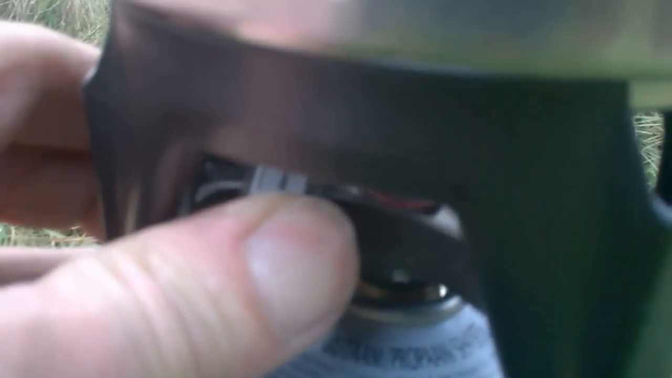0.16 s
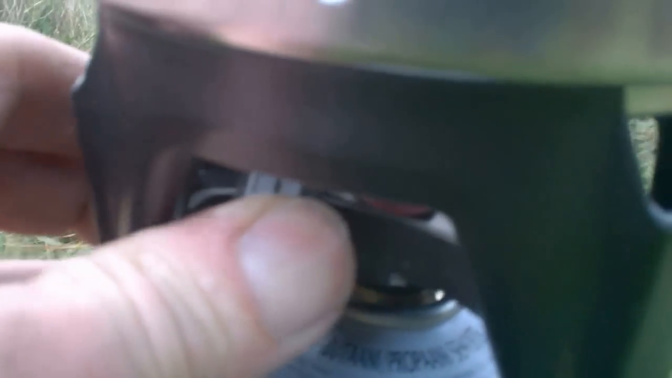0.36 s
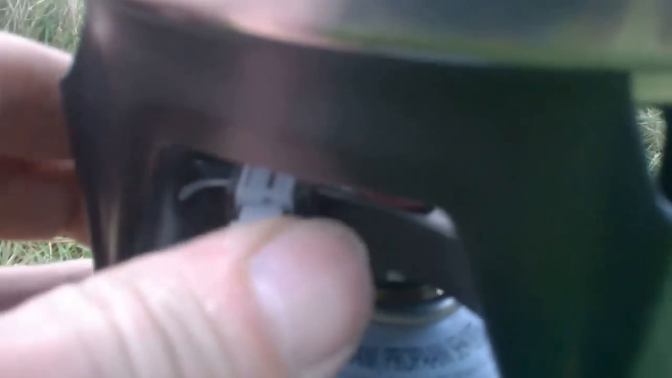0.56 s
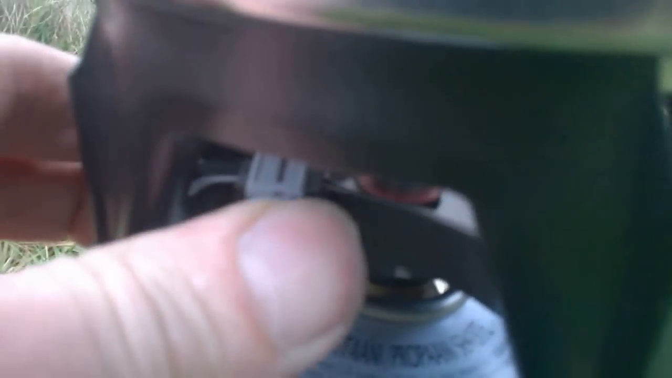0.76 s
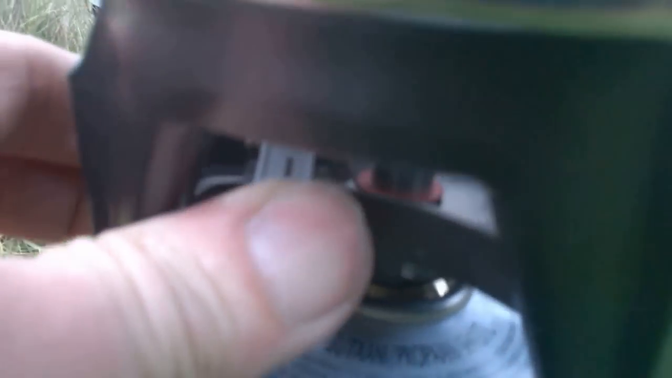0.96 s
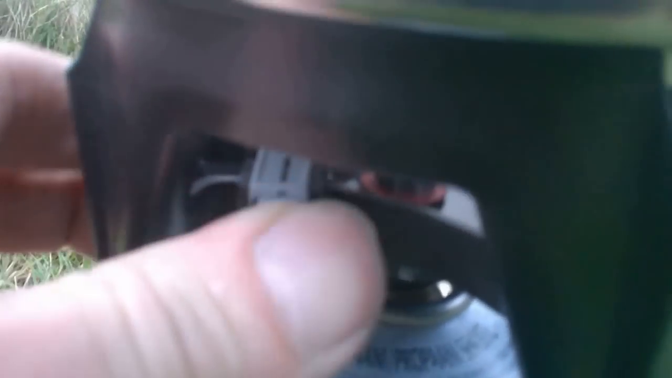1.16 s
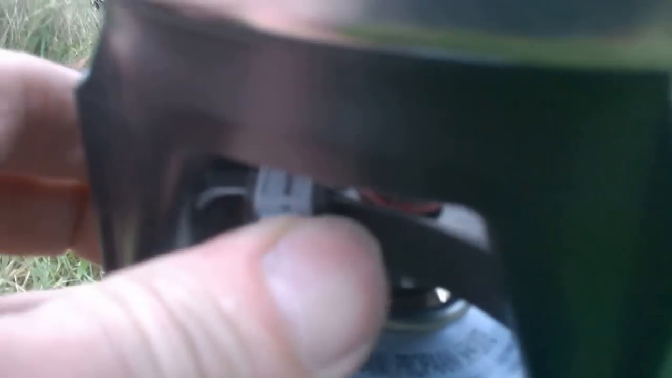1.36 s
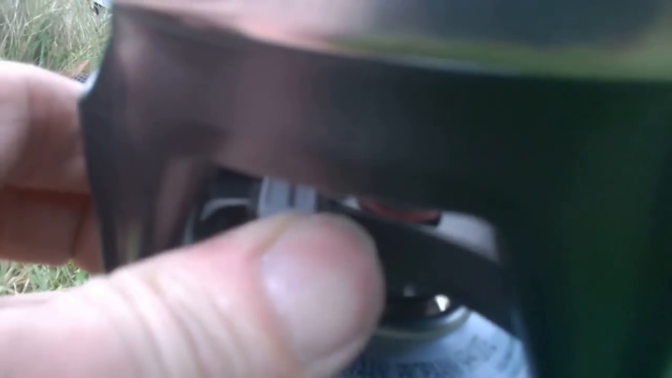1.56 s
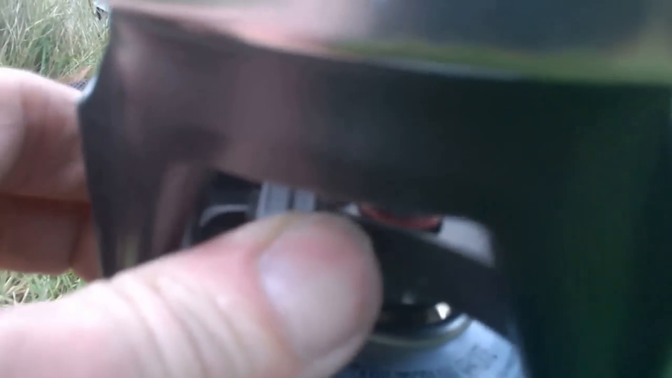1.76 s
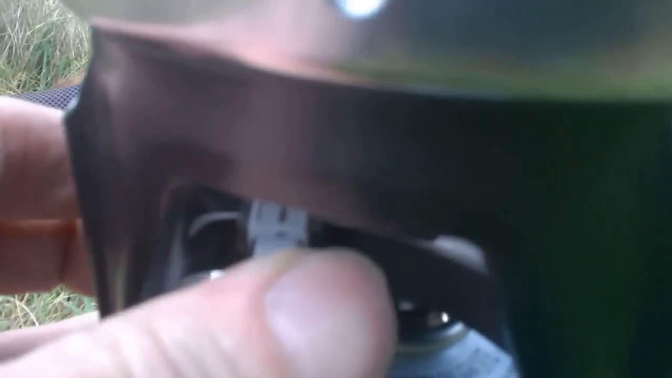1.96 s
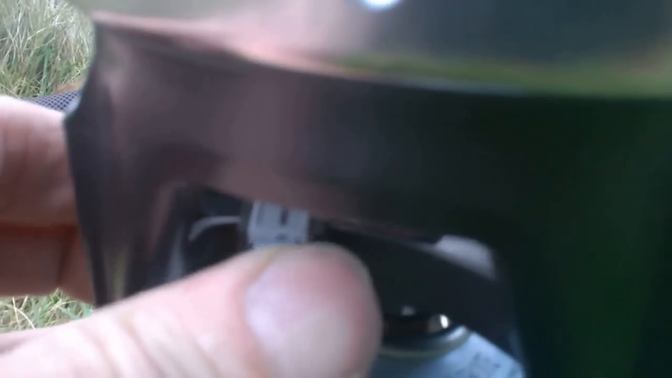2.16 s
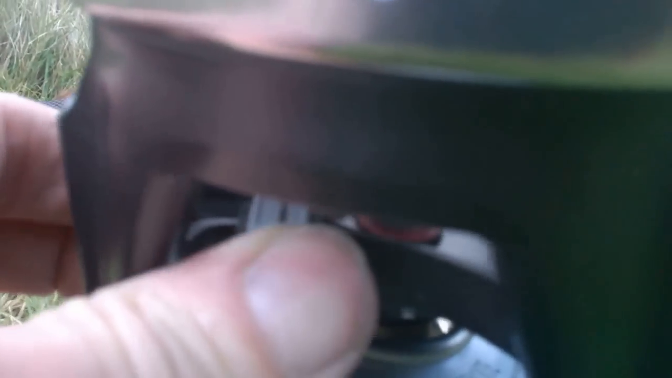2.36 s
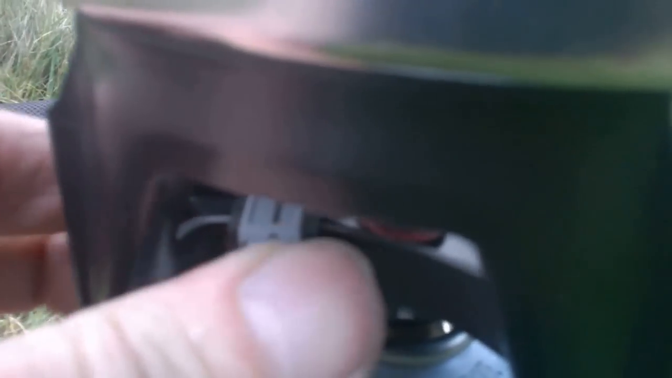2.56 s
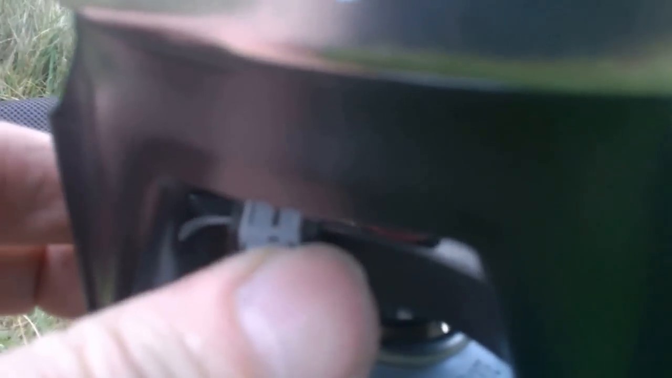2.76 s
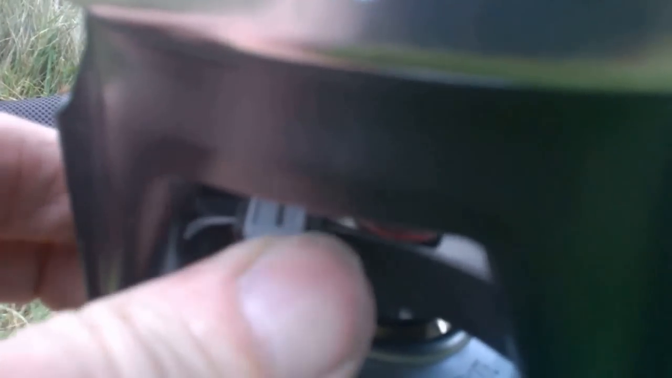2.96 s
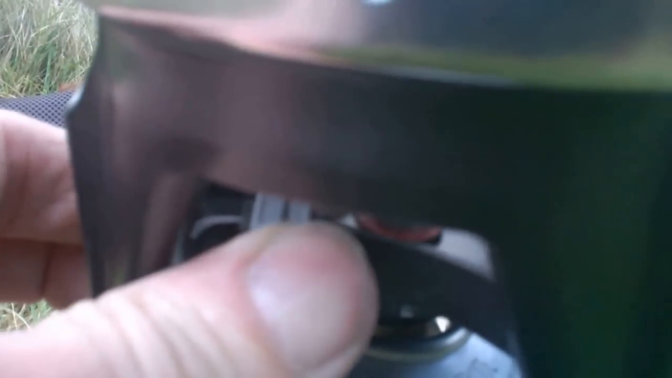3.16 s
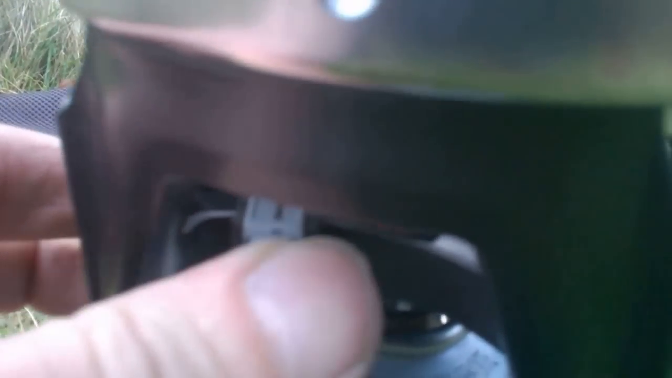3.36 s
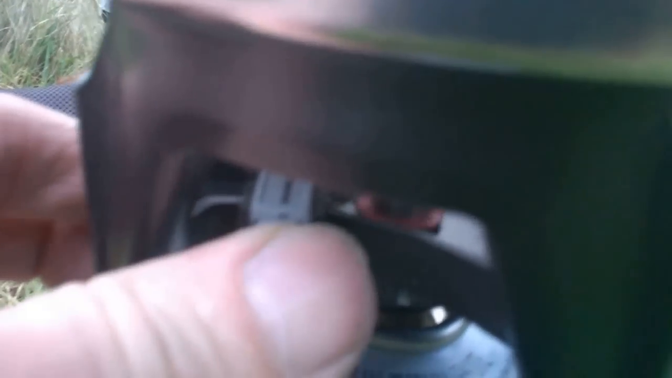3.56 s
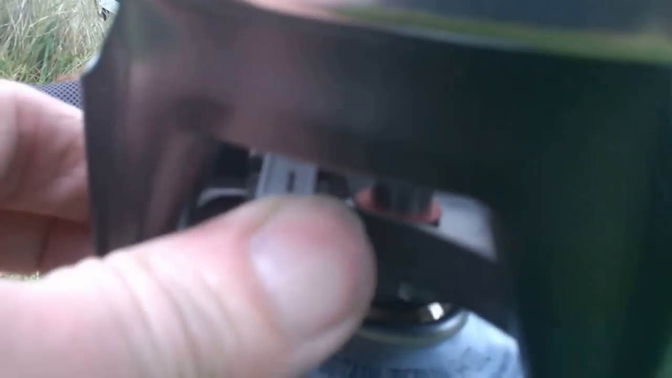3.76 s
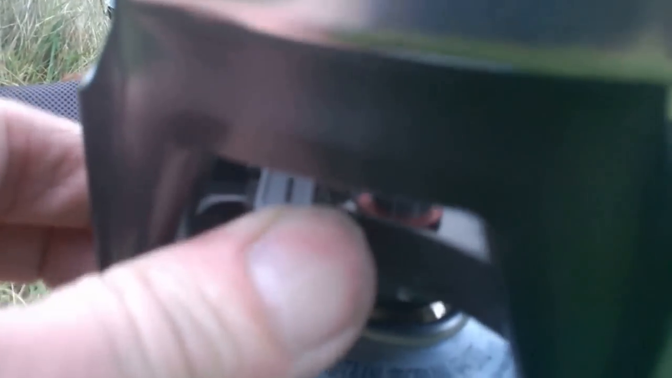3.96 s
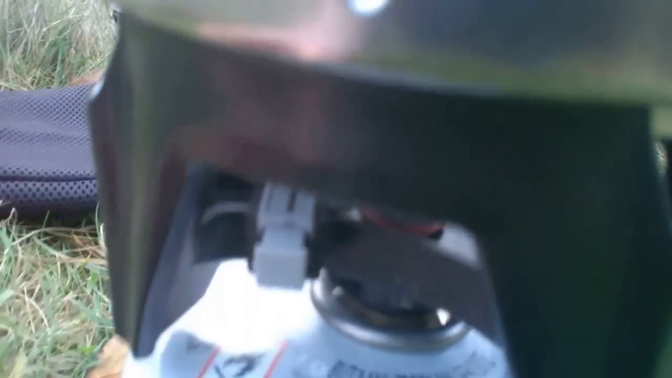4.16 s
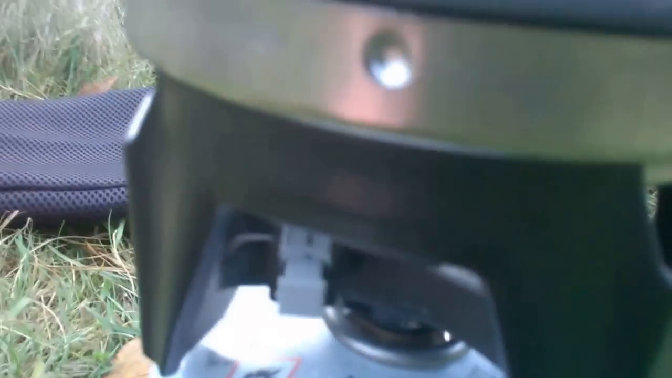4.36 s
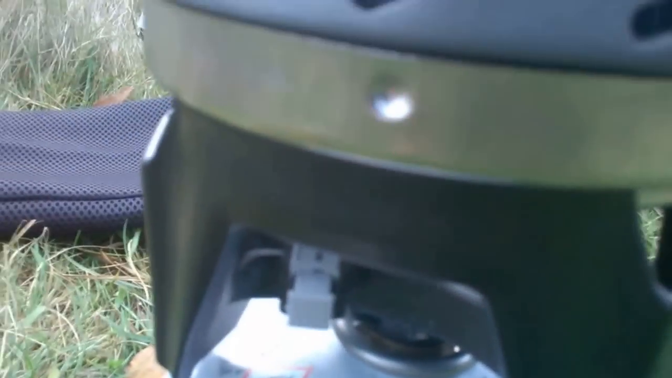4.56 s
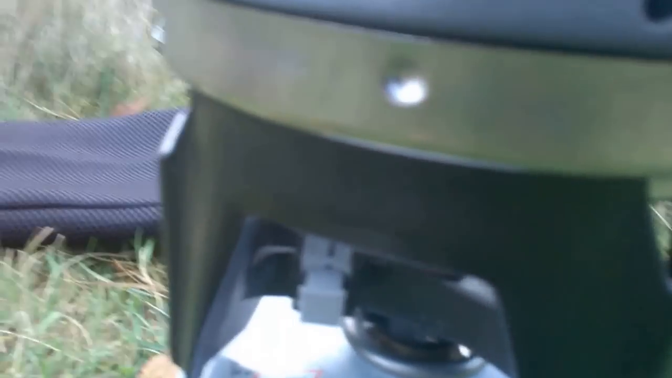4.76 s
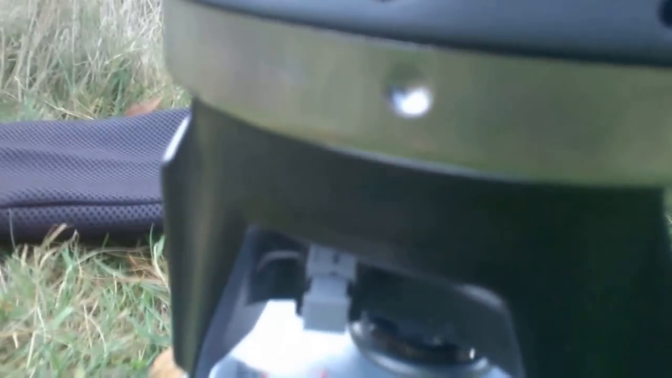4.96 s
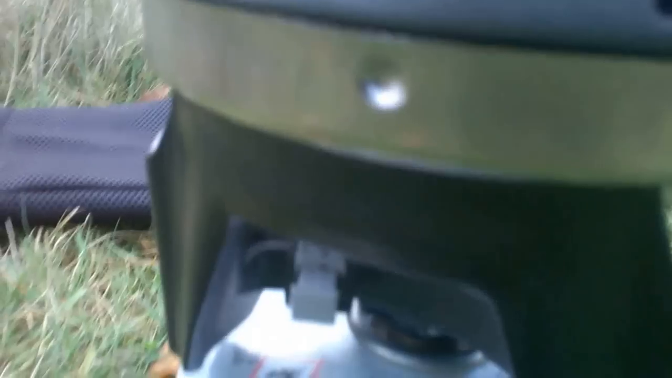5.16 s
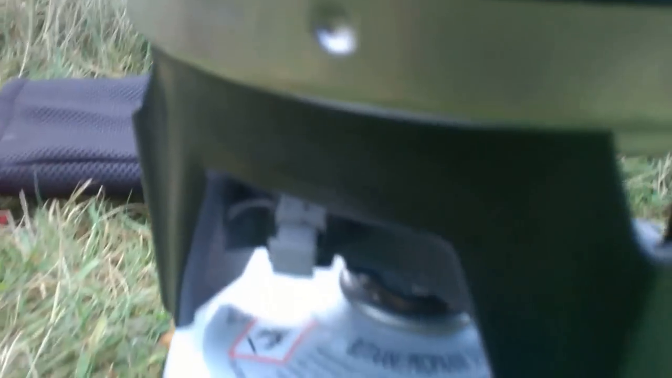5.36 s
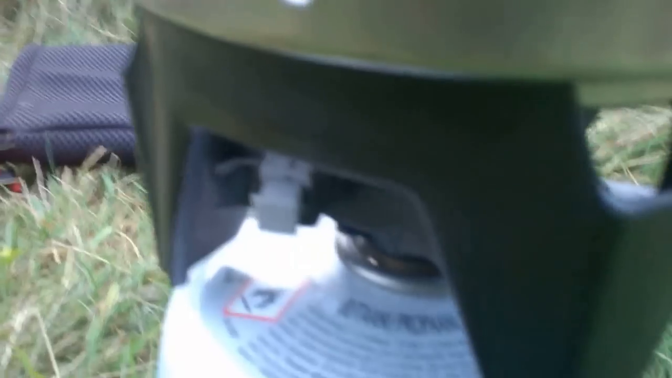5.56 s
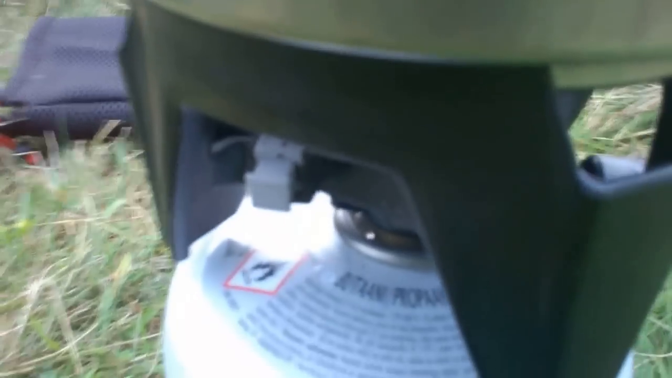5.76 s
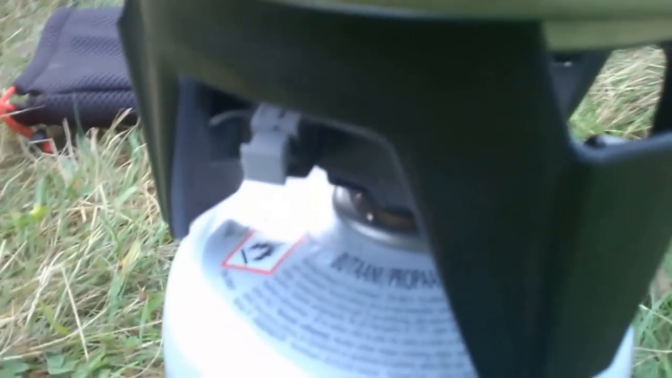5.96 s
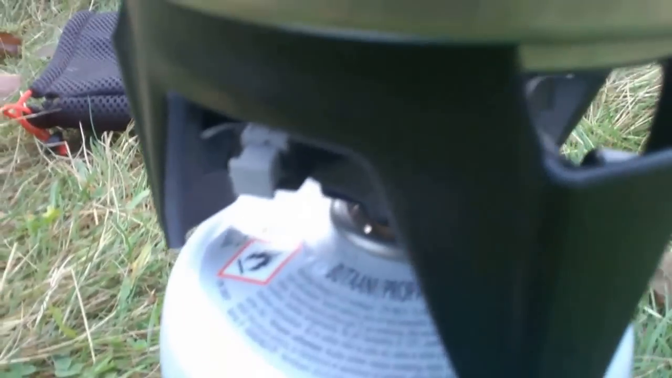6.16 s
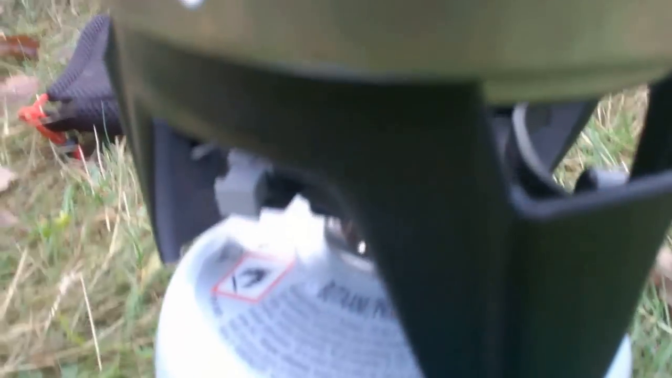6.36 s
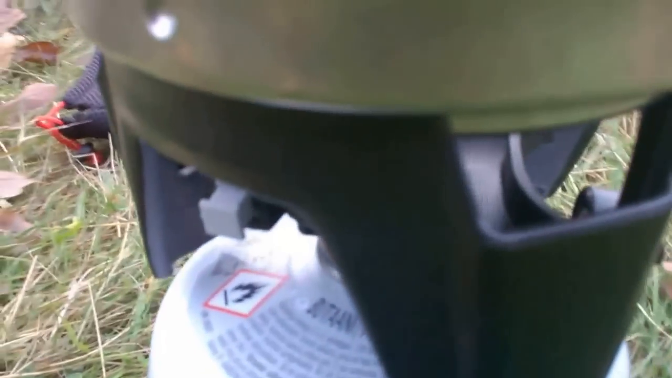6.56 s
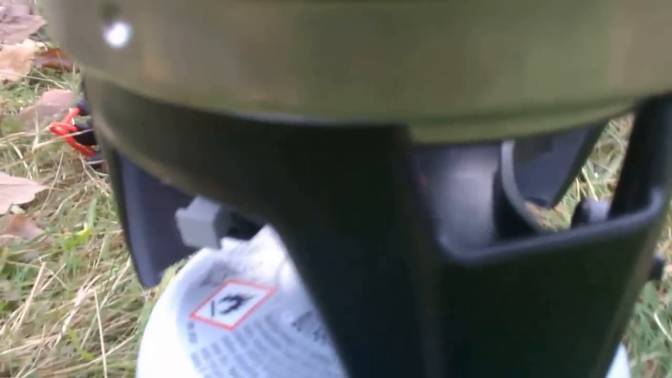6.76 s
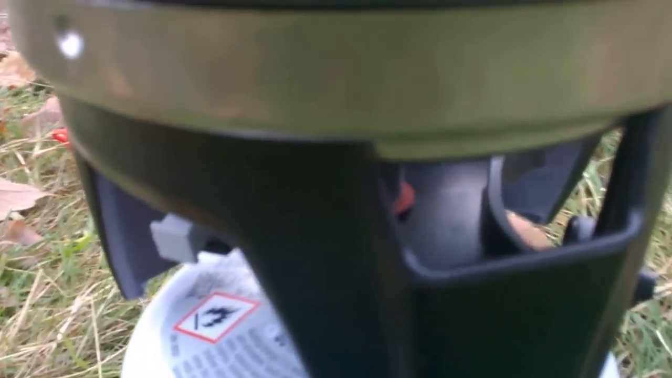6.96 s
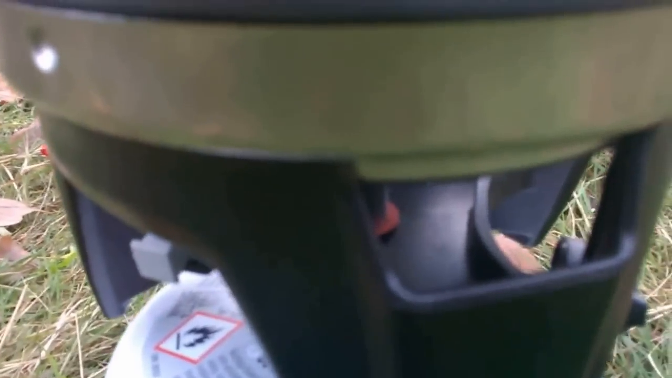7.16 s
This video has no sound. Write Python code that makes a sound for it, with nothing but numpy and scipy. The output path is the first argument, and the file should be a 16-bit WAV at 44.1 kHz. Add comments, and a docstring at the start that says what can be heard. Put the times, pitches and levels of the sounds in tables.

```python
"""Outdoors on grass, a handheld camera's microphone is close to a camping stove.
First gas hisses from the jet as filtered noise, while plastic ticks as resonant noise bursts. A thumb works the
piezo igniter: each press snaps its hammer, each release clacks the button, and both ring the stove's modes.
The sixth spark lights the gas with a low sine thump and a noise puff; the burner roars as shaped noise.
Then its hiss opens as the hand leaves, and shifts between bands and fades as the camera circles and draws back."""
import sys
import numpy as np
from scipy import signal
from scipy.fft import rfft, irfft, next_fast_len
from scipy.io import wavfile
from scipy.ndimage import map_coordinates

SR = 44100
rng = np.random.default_rng(int(sys.argv[2]) if len(sys.argv) > 2 else 0)


def wav_out(sig):
    """Save sig, one row per channel (or a flat mono array), as 16-bit PCM at SR to the path in sys.argv[1]."""
    wavfile.write(sys.argv[1], SR, np.round(np.clip(np.atleast_2d(sig).T, -1, 1) * 32767).astype(np.int16))


N = 318313
CATCH_S = 3.766  # the flame takes hold
HAND_OFF_S, HAND_MOVE_S = 4.1, 0.06  # the hand uncovers the burner: midpoint, time scale


def amp(db):
    """Decibels to gain."""
    return 10 ** (np.asarray(db) / 20)


def unit(x):
    """Scale to rms 1."""
    return x / np.sqrt(np.mean(x ** 2) + 1e-20)


def bump(x):
    """A smooth hump of height 1 around x = 0."""
    return np.exp(-x ** 2)


def decay(t, t60_s):
    """Exponential decay that falls 60 dB in t60_s."""
    return np.exp(-np.log(1000) * t / t60_s)


def wobble(rate):
    """A smooth random curve, rate knots a second."""
    knots = rng.standard_normal(int(N * rate / SR) + 4)
    return map_coordinates(knots, [np.arange(N) * rate / SR])


def filtered(x, response):
    """x times a response of frequency."""
    size = next_fast_len(len(x) + 8192)  # padded so that the filter's tail does not wrap round
    return irfft(rfft(x, size) * response(np.fft.rfftfreq(size, 1 / SR)), size)[:len(x)]


def causal(x, response):
    """x through the minimum-phase filter of that magnitude: nothing sounds before the blow."""
    cepstrum = irfft(np.log(response(np.fft.rfftfreq(len(x), 1 / SR))), len(x))
    cepstrum[1:len(x) // 2] *= 2
    cepstrum[len(x) // 2 + 1:] = 0
    return irfft(rfft(x) * np.exp(rfft(cepstrum)), len(x))


def colour(points):
    """Response through (pitch_hz, level_db) points on a log pitch axis."""
    f, db = np.transpose(points)
    return lambda hz: amp(np.interp(np.log(hz + 1), np.log(f), db))


def resonances(peaks):
    """Response of (pitch_hz, width_hz, level_db) resonances with steep skirts; their powers add."""
    def response(hz):
        power = 0
        for centre, width, db in peaks:
            power = power + amp(db) ** 2 / (1 + ((hz - centre) / width) ** 2) ** 3
        return np.sqrt(power)
    return response


def noise(response, size=N):
    """Coloured noise of rms 1."""
    return unit(filtered(rng.standard_normal(size), response))


def add(track, s, sound):
    """Mix a sound into the track at time s."""
    part = track[round(s * SR):][:len(sound)]
    part += sound[:len(part)]


# Colour of the outdoor air and gas flow: pitch_hz, level_db (relative, per Hz)
AIR_COLOUR = [(15, -50), (25, -12.5), (75, -1.5), (159, 1.5), (194, -1), (365, -1.5), (403, -4),
              (631, -5.5), (1090, -7), (1260, -10.5), (1670, -10.5), (3200, -26.5), (4160, -57),
              (7040, -120)]


def air_wash(level_db=-54):
    """A low wash of air and gas flow: coloured noise with a slightly wandering level."""
    return amp(level_db + 0.55 * wobble(6.5)) * noise(colour(AIR_COLOUR))


# Resonances of the jet in its mixing tube: pitch_hz, width_hz, level_db (relative)
JET_RESONANCES = [(2335, 250, -4), (3680, 205, -4.5), (4060, 240, -11), (4650, 270, -5.5), (5120, 69, -0.5),
                  (5510, 220, 1), (5870, 400, -3), (7100, 230, -18.5), (7930, 530, -16), (9600, 1800, -27),
                  (11500, 870, -26), (12750, 380, -21.5), (14700, 1100, -24.5)]


def gas_jet(level_db=-58):
    """The jet's turbulence hisses almost evenly through the resonances of the mixing tube."""
    return amp(level_db + 0.27 * wobble(4.56)) * noise(resonances(JET_RESONANCES))


# The clearer ticks of the handled plastic: start_s, level_db, pitch_hz (of the part that ticks)
PLASTIC_TICKS = [(.0328, -49.5, 3400), (0.393, -46, 1700), (1.095, -46, 1600), (1.467, -45.5, 4600),
                 (2.189, -46, 1700), (2.597, -37, 1690), (2.978, -44, 4700), (3.637, -42.5, 4700),
                 (4.038, -34, 4200), (4.2118, -35.5, 3480), (5.0439, -39, 4500), (5.0962, -35.5, 3600),
                 (5.1585, -38, 3570), (6.304, -42, 7500), (6.41, -41, 7500)]
# Colour shared by the ticks: pitch_hz, level_db (relative, per Hz)
TICK_COLOUR = [(600, -22), (1600, 4), (2400, 1), (3300, -2), (4600, -1), (5600, -11), (8500, -17),
               (15000, -25)]


def handling(t60_s=0.035, attack_s=0.0012, faint_count=5, faint_db=-60, peak_db=9, width_octaves=0.18):
    """The plastic stand ticks as it is held and turned: short noise bursts, each stressing its part's pitch."""
    track, t = np.zeros(N), np.arange(SR // 10) / SR
    shape = (1 - np.exp(-t / attack_s)) * decay(t, t60_s)  # fingers cushion each tick
    pitches = [pitch for *_, pitch in PLASTIC_TICKS]
    # the grip also creaks at random while the thumb works
    starts = rng.uniform(0, HAND_OFF_S, faint_count)
    faint = [(s, faint_db, rng.choice(pitches)) for s in starts]
    for s, db, pitch in list(PLASTIC_TICKS) + faint:
        def part(hz):
            octaves_away = np.log2((hz + 1) / pitch)
            return colour(TICK_COLOUR)(hz) * amp(peak_db * bump(octaves_away / width_octaves))
        add(track, s, amp(db) * shape * noise(part, len(t)))
    return track


# Modes of the stove and pot: pitch_hz, hammer_db, button_db (relative, under each blow), t60_s
STOVE_MODES = [ (1111, -25, -11, .12), (1249, -31, -42, .33), (1522, -25, -26, .17), (1566, -12, -11, .06),
               (1693, -30, -31, .27), (1815, -22, -9, .06), (2075, -26, -30, .16), (2169, -31, -33, .15),
               (2405, -8, -14, .03), (2552, -33, -30, .16), (2753, -19, -26, .11), (2853, -27, -30, .11),
               (2915, -27, -29, .11), (3002, -26, -27, .18), (3100, -28, -25, .08), (3871, -37, -39, .17),
               (4035, -19, -18, .05), (4204, -28, -20, .06), (4546, -27, -30, .08), (4683, -26, -24, .1),
               (5697, -28, -35, .09), (5959, -35, -40, .16), (6190, -30, -36, .08), (8538, -37, -46, .13),
               (9098, -38, -39, .085)]
# Colour of the housing's dense short ring: pitch_hz, level_db (relative, per Hz)
HOUSING_COLOUR = [(400, -43), (850, -18), (1150, -4), (2800, 2.5), (3300, -1), (4400, 1), (5900, -3),
                  (7000, -11), (9200, -9.5), (12000, -21.5), (15500, -21)]


def contact_chatter(burst, contact_colour):
    """Contacts fall at random, but the same spring always gives the same spectrum and energy."""
    scatter = np.angle(rfft(burst * rng.standard_normal(len(burst))))
    flat_spectrum = irfft(np.exp(1j * scatter), len(burst))
    chatter = causal(np.sqrt(burst) * flat_spectrum, colour(contact_colour))
    return chatter * np.linalg.norm(burst) / np.linalg.norm(chatter)


def blows(events, mode_db, contact_colour, contact_db, contact_s,
          housing_db, housing_t60_s, tail_db, tail_t60_s, ring_db):
    """Each blow is a brief chatter of contacts, then the housing's short ring and the stove's long modes."""
    track, t = np.zeros(N), np.arange(SR // 2) / SR
    hz, _, _, t60_s = np.transpose(STOVE_MODES)
    build = 1 - np.exp(-(t / contact_s) ** 2)  # the ring builds while the contacts last
    burst = (t / contact_s) * np.exp((1 - (t / contact_s) ** 2) / 2)
    phases = rng.uniform(0, 2 * np.pi, (len(hz), 1))
    modes = np.sin(2 * np.pi * hz[:, None] * t + phases) * decay(t, t60_s[:, None])
    housing_fade = amp(housing_db) * decay(t, housing_t60_s) + amp(tail_db) * decay(t, tail_t60_s)
    small_body = signal.butter(3, 800, "high", fs=SR, output="sos")  # a small body radiates no bass
    lasting = t60_s > 0.09
    octaves = np.log2(hz / np.median(hz))
    for s, db, long_db, tilt_db, *_ in events:
        grip_db = long_db + tilt_db * octaves + rng.normal(0, 3.1, len(hz))  # the grip changes the long modes
        stove = amp(mode_db + ring_db + lasting * grip_db) @ modes
        housing = housing_fade * noise(colour(HOUSING_COLOUR), len(t))
        ring = signal.sosfilt(small_body, build * (stove + housing))
        chatter = amp(contact_db) * contact_chatter(burst, contact_colour)
        add(track, s, amp(db) * (chatter + ring))
    return track


# Button slides and springs back: start_s (of the clack), level_db, long_ring_db, ring_tilt_db (per octave),
# slide_s (duration), slide_db
BUTTON_RELEASES = [(0.502, -17.5, 1, -0.5, 0.0079, -40), (1.1727, -18, -2.5, 0.5, 0.0079, -38),
                   (1.9064, -19, -1.5, -0.5, 0.0042, -45), (2.566, -19.5, 0, -1, 0.0055, -50),
                   (3.3043, -19, 1.5, 0.5, .006, -42), (4.021, -16.5, -6, 0, .006, -43)]
# Colour of the button's contacts: pitch_hz, level_db (relative, per Hz)
CLACK_COLOUR = [(200, -32), (750, -17), (1100, 2), (1600, 9), (2050, -49), (2500, 9), (3300, -19.5),
                (4200, 8.5), (5400, -12), (7000, -26), (9500, -21), (15500, -25)]


def button_clacks():
    """The returning button rubs along its guide, then lands with a soft clack that rings the stove."""
    _, _, button_db, _ = np.transpose(STOVE_MODES)
    clacks = blows(BUTTON_RELEASES, button_db, CLACK_COLOUR, contact_db=-6.5, contact_s=0.0014,
                   housing_db=-9.5, housing_t60_s=0.032, tail_db=-27.5, tail_t60_s=0.12, ring_db=-0.5)
    for s, *_, slide_s, slide_db in BUTTON_RELEASES:
        fade = np.sqrt(np.linspace(1, 0, round(slide_s * SR)))  # it rubs free just before it lands
        rub = amp(slide_db) * fade * noise(colour(CLACK_COLOUR), len(fade))
        add(clacks, s - slide_s, rub)
    return clacks


# Hammer snaps: start_s, level_db, long_ring_db (let through by the grip), ring_tilt_db (per octave)
HAMMER_PRESSES = [(.2538, -3.5, -4, -2.5), (.9134, -5.5, -0.5, 0), (1.6134, -5.5, -1, 1),
                  (2.3088, -4.5, -0.5, -1.5), (3.058, -5, 0.5, 3.5), (3.7602, -4.5, -4.5, -4)]
# Colour of the hammer's contacts: pitch_hz, level_db (relative, per Hz)
SNAP_COLOUR = [(150, -45), (400, -21.5), (720, -14.5), (1000, -6.5), (1500, -6), (1950, -6), (2380, 9.5),
               (3050, -17), (4100, -1), (5200, -17.5), (7000, -18.5), (9400, -13), (12500, -22),
               (15500, -15.5)]


def hammer_snaps():
    """The sprung hammer strikes hard inside the igniter and rings its housing and the stove."""
    _, hammer_db, _, _ = np.transpose(STOVE_MODES)
    return blows(HAMMER_PRESSES, hammer_db, SNAP_COLOUR, contact_db=-5.5, contact_s=0.0015,
                 housing_db=-11, housing_t60_s=0.034, tail_db=-29.5, tail_t60_s=0.15, ring_db=-1.5)


# Colour of the flame's rumble, also used for the puff: pitch_hz, level_db (relative, per Hz)
RUMBLE_COLOUR = [(15, -65), (25, -40), (99, -7), (151, -1.5), (226, -3.5), (339, -2.5), (474, -7),
                 (644, -9), (700, -6.5), (910, -32), (1540, -120)]


def ignition(thump_db=-21, thump_hz=105, swell_s=0.0073, puff_db=-30, lag_s=0.00697):
    """The gathered gas burns at once: a low thump of a few cycles and a puff."""
    track, t = np.zeros(N), np.arange(SR // 5) / SR
    swell = t / swell_s * np.exp((1 - (t / swell_s) ** 2) / 2)
    thump = amp(thump_db) * np.sin(2 * np.pi * thump_hz * t)
    puff = amp(puff_db) * noise(colour(RUMBLE_COLOUR), len(t))
    add(track, CATCH_S + lag_s, swell * (thump + puff))
    return track


# The hiss out of the hollow of the hand: pitch_hz, width_hz, level_db (relative)
CUPPED_BANDS = [(2200, 260, 12.5), (2670, 200, 4), (5600, 710, -4), (6550, 400, -10), (8300, 440, -7.5)]


def cupped_hiss(age, level_db=-48, flare_db=6, flare_s=0.08):
    """Under the hand the flame hisses through hollow bands, flaring as it takes hold."""
    return amp(level_db + flare_db * np.exp(-age / flare_s)) * noise(resonances(CUPPED_BANDS))


# The hiss through the front opening: pitch_hz, width_hz, level_db (relative)
FRONT_BANDS = [(2075, 230, 8), (2540, 114, 8.5), (3710, 440, -1.5), (4020, 290, -6), (4840, 280, -5),
               (4970, 260, -5), (5480, 180, -1.5), (6430, 300, -12), (10250, 500, -17), (12500, 2000, -34),
               (15000, 1000, -32)]
# The hiss past the legs, from the side: pitch_hz, width_hz, level_db (relative)
SIDE_BANDS = [(2120, 180, 7.5), (2560, 93, 4.5), (2700, 110, 5.5), (3540, 460, -2), (4130, 560, 2.5),
              (4515, 250, 8.5), (4986, 170, 10), (5650, 110, 10), (6470, 150, -5), (10620, 310, -15),
              (12700, 400, -39)]
# The highest hiss, beamed straight out of the vents: pitch_hz, width_hz, level_db (relative)
SIZZLE_BANDS = [(7320, 310, 6.5), (7950, 280, 4), (8630, 320, 2.5), (9030, 300, 3.5), (9500, 290, 8),
                (10080, 400, -2), (10750, 500, -2.5)]
# Legs of the stand pass between vents and camera: middle_s, half_length_s, sizzle_loss_db, lower_hiss_gain_db
LEG_SHADOWS = [(4.898, 0.14, 5, -1), (5.85, 0.57, 16, 0.5)]


def open_hiss(age, side, vent_db=-46.5, sizzle_db=-62.5, recede_db_per_s=0.69):
    """Vent turbulence moves from front to side bands; passing legs shade the sizzle, and the lower hiss recedes."""
    t = np.arange(N) / SR
    vent_db = vent_db - recede_db_per_s * age  # the camera draws back
    for s, half_s, loss_db, gain_db in LEG_SHADOWS:
        hidden = bump(((t - s) / half_s) ** 2)  # flat-topped
        vent_db = vent_db + gain_db * hidden
        sizzle_db = sizzle_db - loss_db * hidden
    front = np.sqrt(1 - side) * noise(resonances(FRONT_BANDS))
    flank = np.sqrt(side) * noise(resonances(SIDE_BANDS))
    return amp(vent_db) * (front + flank) + amp(sizzle_db) * noise(resonances(SIZZLE_BANDS))


# The camera circles the stove: time_s, side_share (0 front to 1 side)
CAMERA_ORBIT = [(4.8, .06), (5.15, 0.35), (5.5, 0.62), (6.0, 0.99), (7.22, 0.9)]


def hiss(age, echo=0.19, front_ms=0.9, side_ms=0.77, hand_ms=0.76):
    """Cupped hiss gives way to open hiss, with one short echo off the hand, then off the stand."""
    t = np.arange(N) / SR
    uncovered = (1 + np.tanh((t - HAND_OFF_S) / HAND_MOVE_S / 2)) / 2
    side = np.clip(np.interp(t, *np.transpose(CAMERA_ORBIT)), 0, 1)
    direct = np.sqrt(uncovered) * open_hiss(age, side) + np.sqrt(1 - uncovered) * cupped_hiss(age)
    stand_ms = (1 - side) * front_ms + side * side_ms
    delay_ms = uncovered * stand_ms + (1 - uncovered) * hand_ms
    return direct + echo * map_coordinates(direct, [np.arange(N) - delay_ms * SR / 1000])


# Colour of the flame's roar in the burner cup: pitch_hz, level_db (relative, per Hz)
CUP_COLOUR = [(350, -43), (600, -15), (790, -3.5), (930, 1), (1070, 0.5), (1210, -3), (1420, -1.5),
              (1570, -6.5), (1730, -17.5), (1880, -25.5), (2080, -25.5), (2330, -37), (2570, -30),
              (3050, -37.5), (4500, -73)]


def burner(settled_db=-27, rumble_db=-7, flutter_db=0.3, drift_db=0.1, spread_s=0.0082):
    """The turbulent flame catches, sags and settles; it rumbles, roars in the cup and hisses out of the vents."""
    age = np.maximum(np.arange(N) / SR - CATCH_S, 0)
    lit = np.clip(age / spread_s, 0, 1)  # the flame runs across the burner
    surge_db = 1 * np.exp(-age / 0.52)  # the cold burner runs a little loud
    sag_db = 3.5 * bump((age - 0.12) / 0.061)  # the gathered gas is spent
    flame_db = settled_db + surge_db - sag_db + drift_db * wobble(3.1)
    flutter = flutter_db * wobble(45)
    rumble = amp(flame_db + rumble_db + flutter + 0.13 * wobble(12)) * noise(colour(RUMBLE_COLOUR))
    roar = amp(flame_db + flutter) * noise(colour(CUP_COLOUR))
    return lit * (rumble + roar + amp(flutter / 2) * hiss(age))


def scene():
    """Background air and gas, handling, igniter and flame add up dry, as in the open air."""
    background = air_wash() + gas_jet() + handling()
    igniter = button_clacks() + hammer_snaps()
    return (background + igniter + ignition() + burner())[None]


def record(dry, ceiling=0.7, top_hz=15750):
    """The camera rounds off the highest peaks and fades out the treble in the 200 Hz above top_hz."""
    rounded = dry[0] / (1 + (dry[0] / ceiling) ** 4) ** (1 / 4)
    return filtered(rounded, lambda hz: np.clip((top_hz - hz) / 200 + 1, 0, 1))[None]


dry = scene()
out = record(dry)
wav_out(out)
```